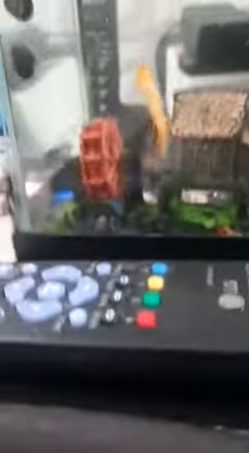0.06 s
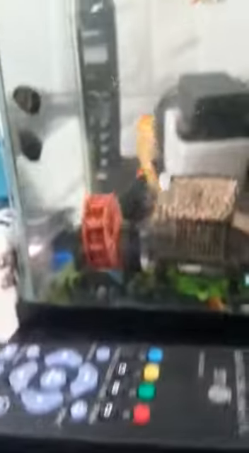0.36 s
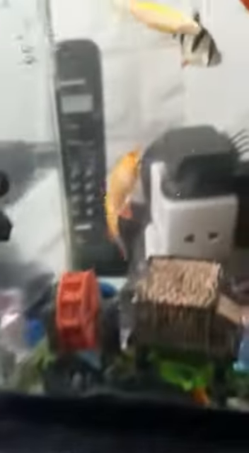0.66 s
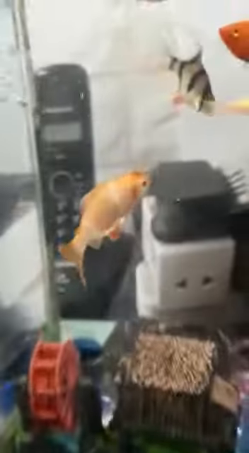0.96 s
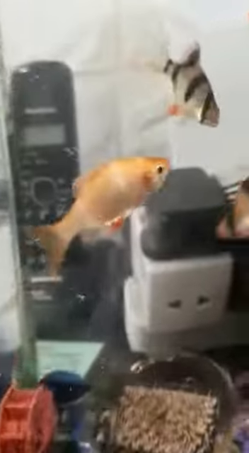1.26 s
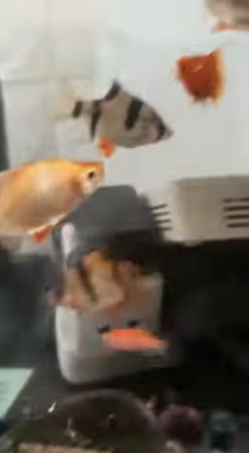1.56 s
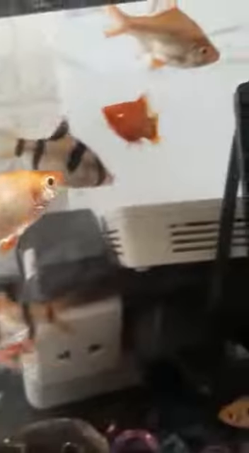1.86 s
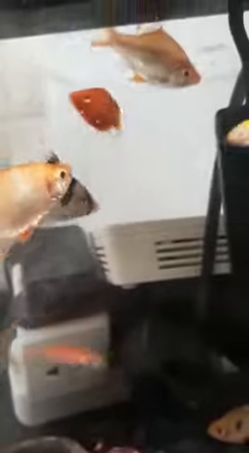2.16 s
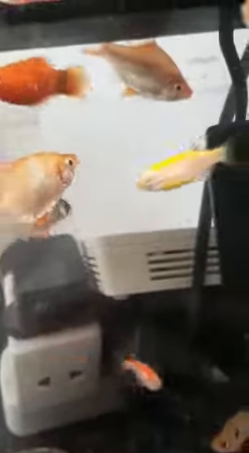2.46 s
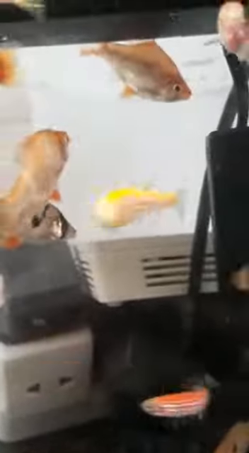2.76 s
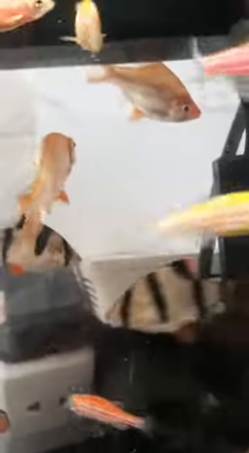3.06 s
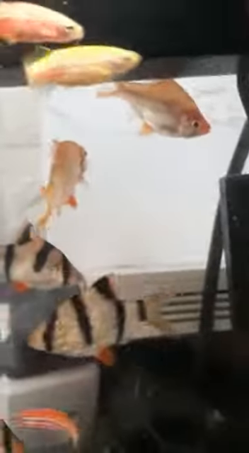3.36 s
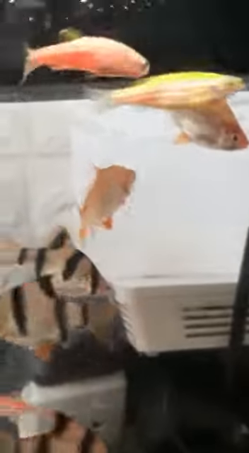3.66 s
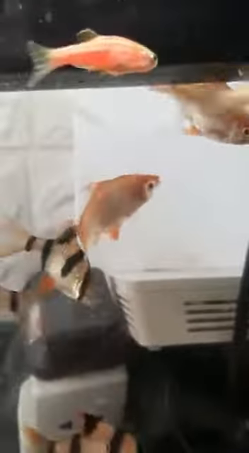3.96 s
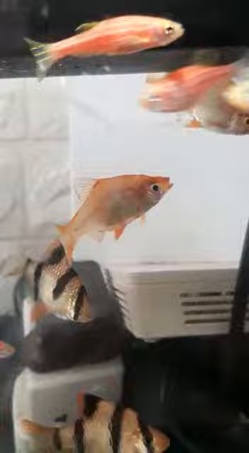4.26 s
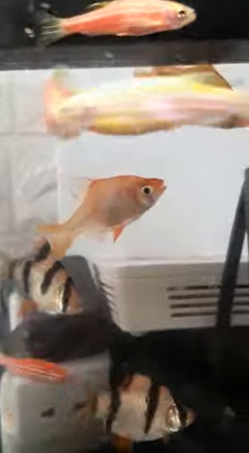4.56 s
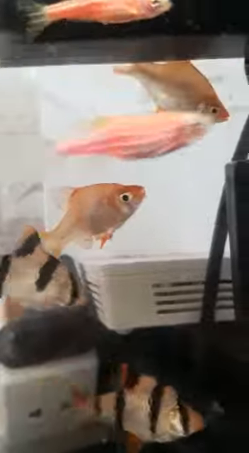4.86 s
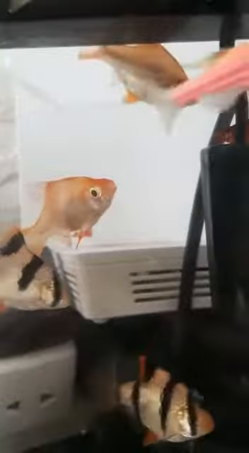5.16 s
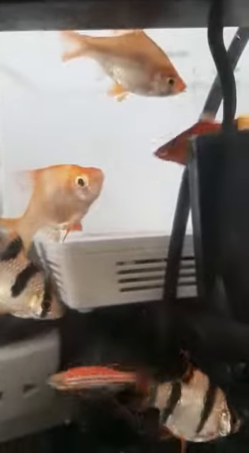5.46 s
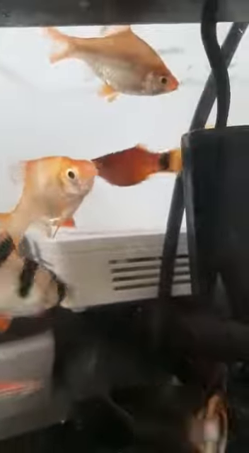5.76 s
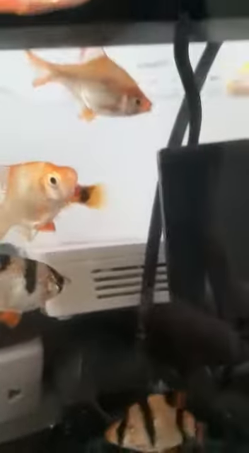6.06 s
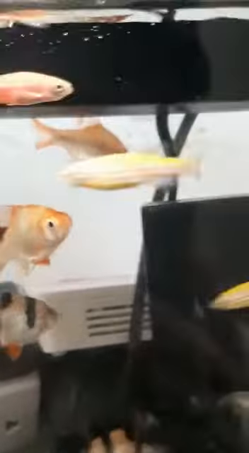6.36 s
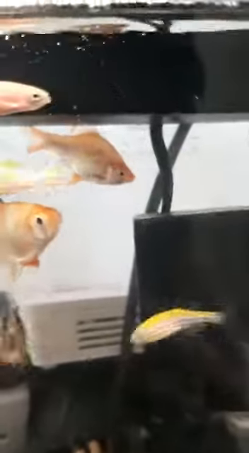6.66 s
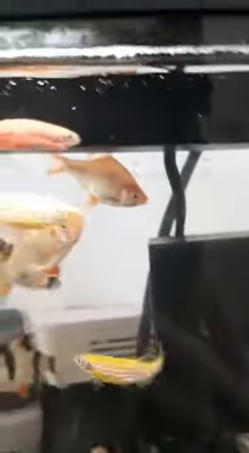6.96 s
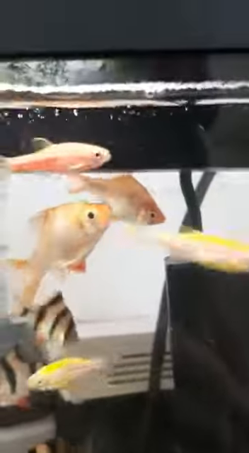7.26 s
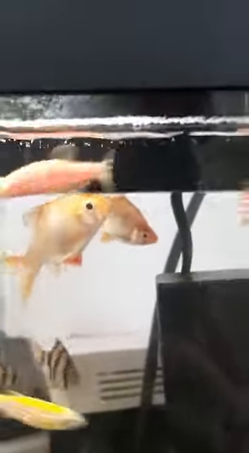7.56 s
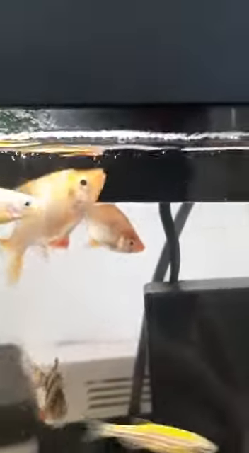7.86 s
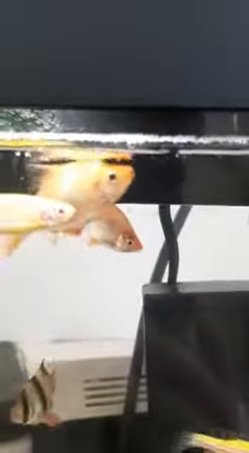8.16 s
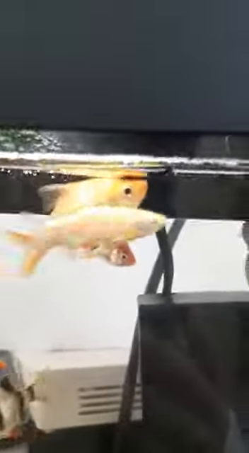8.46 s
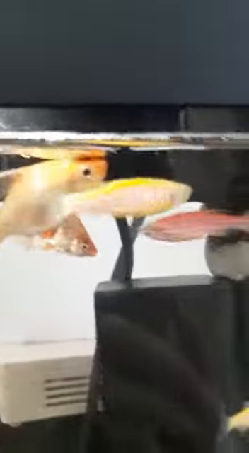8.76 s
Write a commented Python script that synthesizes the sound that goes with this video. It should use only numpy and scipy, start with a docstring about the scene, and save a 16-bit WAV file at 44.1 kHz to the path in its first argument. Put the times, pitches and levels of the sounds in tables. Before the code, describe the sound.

A small aquarium filter pump hums steadily through a glass tank for the whole nine seconds, low and slightly rumbling, close to a hand-held phone. The hum swells a little and moves from the left to the centre during the first second. Over it, water trickles softly, dull at first. Single bubbles plip irregularly throughout, the clearest at about 0.5, 1.5, 2.4, 3, 6, 6.2 and 7.2 seconds. A hand brushes faintly over the phone during the first three seconds. A short, dull tap comes at 1.4 seconds, and a small, soft splash between 4.4 and 4.9 seconds. Around then the microphone rises to the rim: the water becomes brighter and a smooth high hiss comes up and stays. Light taps fall near 6, 7 and 8.3 seconds, while the hum and trickle continue to the end.

```python
"""A small aquarium filter pump hums through the glass tank and its stand, close to a hand-held phone.
The outflow churns and trickles at the surface, where single bubbles plip under the hood.
The phone's two microphones close in over the first second or so; about halfway they rise to the rim,
where the water is brighter and a high hiss comes up. A hand brushes over the case in the first
seconds; a few light taps and a small splash fall here and there."""
import sys
import numpy as np
from scipy import signal
from scipy.fft import rfft, irfft
from scipy.io import wavfile

SR = 44100
rng = np.random.default_rng(int(sys.argv[2]) if len(sys.argv) > 2 else 0)


def digitize_waveform(pressure):
    """Quantize a signal to 16-bit integers and store it at the path in sys.argv[1].

    Rows of a 2-D input are taken as channels; values are limited to [-1, 1].
    """
    field = np.atleast_2d(pressure).T
    bounded = np.clip(field, -1, 1)
    quanta = np.round(bounded * 32767).astype(np.int16)
    wavfile.write(sys.argv[1], SR, quanta)


N = 388080
T = np.arange(N) / SR
FREQS = np.fft.rfftfreq(N, 1 / SR)

# Levels in the tables are relative; side_db is left minus right.
# hum of the rotor: shaft_multiple, level_db, side_db
ROTOR_HARMONICS = [(2, -55, 6.5), (3, -58.5, 5), (4, -45, .5), (5, -48, 4), (6, -48.5, -1.5), (7, -53, 0),
                   (8, -57, 4.5), (9, -64.5, 8), (10, -51, 3), (11, -46.5, -3), (12, -59, -7),
                   (13, -70, 12.5), (14, -63.5, -7.5), (16, -79, -24), (20, -75.5, 11.5), (23, -72, 12.5)]
# magnetic buzz and its beats with the shaft: mains_multiple, added_shaft_multiple, level_db, side_db
MAINS_BUZZ = [(2, 0, -54, -8), (2, 1, -51.5, 3), (4, 0, -56, 2.5), (4, 1, -71, 2)]
# resonances of tank and stand: pitch_hz, nominal_width_hz, level_db, side_db
TANK_MODES = [(56, 9.4, -65, -7.5), (76, 7.5, -58.5, -7.5), (121.4, 20, -66, -10), (145.2, 15.8, -54, 2.5),
              (205.8, 41, -51.5, 7.5), (247.6, 56, -59, 5.5), (306, 45, -59, 0), (368.4, 90, -53.5, -3),
              (461, 98, -58, -1), (580, 200, -61, 7.5)]
# spectrum of running water: frequency_hz, level_db
WATER_SPECTRUM = [(300, -4), (600, -3.5), (850, 1.5), (1100, -3), (1350, -3.5), (1700, -4), (2400, -11.5),
                  (3500, -10), (4500, -13), (7000, -11.5), (15000, -16)]
# clear single bubbles: start_s, level_db, pitch_hz
CLEAR_BUBBLES = [(.51, -33, 1290), (1.248, -49, 2570), (1.26, -35.5, 1520), (1.448, -33, 1160),
                 (1.594, -29.5, 1330), (1.677, -46, 2560), (2.218, -38, 1740), (2.378, -43.5, 1850),
                 (2.419, -33.5, 1385), (2.641, -40, 1300), (2.87, -42, 1660), (2.964, -32.5, 1510),
                 (3.097, -41.5, 3210), (3.287, -51, 2920), (3.429, -38, 1570), (4.154, -44, 3040),
                 (4.18, -40.5, 1670), (4.695, -54, 10500), (5.808, -46.5, 3100), (5.985, -30.5, 1335),
                 (6.166, -28.5, 1326), (6.563, -39, 1804), (6.85, -49, 6500), (6.884, -44.5, 1860),
                 (7.189, -33.5, 1280), (7.309, -50, 2530), (7.722, -49, 3460), (7.93, -40.5, 1220),
                 (8.21, -47, 3070), (8.381, -45, 2780), (8.526, -44.5, 3520)]
# light taps and a small splash: start_s, level_db, brightness_hz, t60_s
TAPS_AND_SPLASH = [(1.362, -36, 750, .022), (3.606, -49.5, 2000, 0.059), (4.413, -51.5, 12000, 0.21),
                   (4.835, -50.5, 2200, 0.31), (4.863, -48, 1500, .17), (5.954, -38, 2000, 0.032),
                   (6.958, -41, 4940, 0.023), (7.985, -46, 7000, .025), (8.339, -48, 4000, 0.069)]
# spectrum of skin sliding on the case: frequency_hz, level_db
SKIN_SPECTRUM = [(2500, 0.5), (3300, -4.5), (5000, -6), (7000, -3), (9000, -5.5), (12000, -7), (15000, -2)]
# strokes of the hand: start_s, fastest_s, end_s, level_db, brightness_hz
HAND_STROKES = [(-.1, .04, 0.23, -51, 11000), (.1, .22, 0.51, -56.5, 12500), (.36, .45, 0.54, -56.5, 9500),
                (0.672, 0.724, 0.86, -54.5, 12900), (.84, 0.983, 1.15, -52, 12100),
                (1.0, 1.14, 1.4, -56.5, 10700), (1.327, 1.49, 1.86, -51, 7900),
                (1.773, 2.04, 2.2, -61.5, 7900), (2.503, 2.936, 3.17, -61, 4850),
                (3.1, 3.25, 3.31, -63, 10000)]
# spectrum of the high hiss: frequency_hz, level_db
HISS_SPECTRUM = [(2000, -4), (4300, 3), (6000, -4), (7800, -12), (10000, 1), (14000, 0.5), (15500, 2)]

BIG_HZ, TINY_HZ = 1600, 5000  # bubbles pitched below the first plop; above the second they only spit


def pump(shaft_hz=47.97, mains_hz=50.0, waver_db=1.0, wobble_rad=0.019, dispersion_rad=.68):
    """Shaft harmonics and mains buzz through the glass; the water load makes each line waver a little."""
    shaft = 2 * np.pi * shaft_hz * T + wobble_rad * walk(1.4)
    mains = 2 * np.pi * mains_hz * T
    # bending waves in the glass disperse the kick of each turn into a sweep
    lines = [(round(k) * shaft + dispersion_rad * round(k) ** 2, db, side)
             for k, db, side in ROTOR_HARMONICS]
    lines += [(round(m) * mains + round(k) * shaft + rng.uniform(0, 2 * np.pi), db, side)
              for m, k, db, side in MAINS_BUZZ]
    out = np.zeros((2, N))
    for phase, db, side in lines:
        hz = (phase[-1] - phase[0]) / (2 * np.pi * T[-1])
        # shorter waves differ more in phase between the microphones
        lead = np.array([[.5], [-.5]]) * min(.55 * (hz / 528) ** 6, 2.5)
        out += np.sqrt(2) * undb(db + waver_db * walk(1.57)) * pan(side) * np.cos(phase + lead)
    return out


def churn(surge_db=0.96):
    """Turbulence around the impeller rumbles in the resonances of tank and stand."""
    out = np.zeros((2, N))
    for hz, width, db, side in TANK_MODES:
        unshared = .08 + (hz / 680) ** 3  # the bass reaches both microphones alike
        push = rng.standard_normal(N) + unshared * rng.standard_normal((2, N))
        out += band(push, hz, 1.34 * width) * undb(db + surge_db * walk(3.7)) * pan(side)
    return out


def trickle(count=4000, spread_db=3.5, fizz_db=-5, wash_db=-2, ripple_db=2.7, gain_db=-55):
    """The outflow folds countless tiny bubbles into the surface over a soft wash."""
    fizz = np.zeros(N)
    for when, pitch, size in rng.random((count, 3)):
        strength = undb(-spread_db * np.log(max(size, .03)))
        add(fizz, when * N / SR, strength * bubble(hz=850 * 6 ** pitch, t60=0.015, rise=.1))
    fizz = room(np.array([fizz, fizz]), wet_db=4.5, t60=0.083)
    # the low wash comes straight from the surface, the treble is scattered by the hood
    straight = resonate(rng.standard_normal(N), hz=1130, width=1400)
    wash = 1.19 * mic_pair(np.array([straight, straight])) + 0.65 * rng.standard_normal((2, N))
    water = undb(fizz_db) * colour(fizz, WATER_SPECTRUM)
    water += undb(wash_db + ripple_db * walk(6.3)) * colour(wash, WATER_SPECTRUM)
    # the water's treble is duller for the first second or so, and brightens about halfway
    dull = irfft(rfft(water) / (1 + (FREQS / 2000) ** 8), N)
    treble_db = -4 + 3 * mic_height() - opening()
    return (dull + undb(treble_db) * (water - dull)) * undb(gain_db) * pan(-2)


def plips(plop_rise=0.16, ping_rise=0.025, splash_db=-21, spray_db=-15, spit_db=10, snap_db=-12):
    """Big bubbles plop upward in pitch on the right, small ones ping and spray left; the hood echoes."""
    out = np.zeros((2, N))
    t = T[:SR // 5]
    for start, db, hz in list(CLEAR_BUBBLES) + faint_bubbles():
        big = 1 / (1 + (hz / BIG_HZ) ** 20)
        tiny = 1 / (1 + (TINY_HZ / hz) ** 10)
        gain = undb(db) * pan(7 * (1 - 2 * big))
        ring = bubble(hz, t60=.042 * (hz / BIG_HZ) ** .6, rise=ping_rise + plop_rise * big)
        add(out, start, gain * (1 - tiny) * ring)
        spatter = band(rng.standard_normal((2, len(t))), hz, 0.39 * hz) * decay(t, t60=0.2)
        spatter_db = spray_db + (splash_db - spray_db) * big + spit_db * tiny
        # the film breaks with a brief, broad snap
        snap = band(rng.standard_normal(len(t)), hz, 0.59 * hz) * decay(t, t60=.012)
        add(out, start, gain * (undb(spatter_db) * spatter + undb(snap_db) * snap))
    return room(out, wet_db=-8, t60=.2)


def faint_bubbles(count=10, low_hz=1200, high_hz=3310, spread_db=2.5):
    """Small chance bubbles, the higher the weaker: start_s, level_db, pitch_hz."""
    when, pitch, weakness = rng.random((count, 3)).T
    hz = low_hz * (high_hz / low_hz) ** pitch
    db = -50 - spread_db * (2 * weakness - 1) - 20 * np.log10(hz / BIG_HZ)
    return list(zip(when * N / SR, db, hz))


def bubble(hz, t60, rise):
    """A pocket of air rings and dies away, its pitch climbing as it nears the surface."""
    t = T[:int(t60 * SR) + 2]
    pitch_hz = hz * (1 + rise * (.6 - np.exp(-5 * t / t60)))
    cycles = np.cumsum(pitch_hz) / SR
    return np.sin(2 * np.pi * cycles) * decay(t, t60) * (1 - np.exp(-cycles))


def taps_and_splash(gain_db=-4):
    """Light taps and a small splash: short cracks, duller or brighter."""
    out = np.zeros((2, N))
    t = T[:SR // 4]
    for start, db, hz, t60 in TAPS_AND_SPLASH:
        crack = unit(resonate(rng.standard_normal((2, len(t))), hz, 1.15 * hz))
        add(out, start, undb(db + gain_db) * crack * decay(t, t60))
    return room(out, wet_db=-7, t60=.2)


def hand(squeak_db=-48.5, grip_db=1.4, drift_db=0.56):
    """Handling noise at the microphones: skin slides over the case and catches once in a thin squeak."""
    friction = colour(rng.standard_normal((2, N)), SKIN_SPECTRUM)
    squeak = unit(resonate(friction, hz=10800, width=1600))
    out = undb(squeak_db) * stroke(start_s=0.83, fastest_s=0.885, end_s=0.94) * squeak
    for start, fastest, end, db, hz in HAND_STROKES:
        grain = np.roll(friction, rng.integers(N), axis=1)
        out += undb(db) * stroke(start, fastest, end) * unit(resonate(grain, hz, 1.24 * hz))
    # the skin grips and lets go
    return out * undb(grip_db * walk(130) + drift_db * walk(24)) * pan(-3)


def stroke(start_s, fastest_s, end_s):
    """Loudness of one slide follows the hand as it speeds up evenly, then slows to rest."""
    speed = np.interp(T, [start_s, fastest_s, end_s], [0, 1, 0])
    return speed ** 0.62


def hiss(below_db=-68, rim_db=-56.5):
    """A smooth high hiss that grows as the microphones rise towards the surface."""
    db = below_db + (rim_db - below_db) * mic_height()
    return colour(rng.standard_normal((2, N)), HISS_SPECTRUM) * undb(db) * pan(-1)


def room(x, wet_db, t60):
    """Direct sound plus dense reflections from hood, glass and walls, different at each microphone."""
    t = T[:SR // 2]
    tail = rng.standard_normal((2, len(t))) * decay(t, t60) * (1 - np.exp(-t / 0.0068))
    tail /= np.sqrt(np.sum(tail ** 2, axis=1, keepdims=True))
    reflections = signal.fftconvolve(x.mean(axis=0)[None], tail, axes=1)[:, :N]
    return mic_pair(x) + undb(wet_db) * reflections


def mic_pair(x, lag_s=0.00045):
    """Sound from the surface reaches the left microphone first."""
    return np.array([x[0], irfft(rfft(x[1]) * np.exp(-2j * np.pi * FREQS * lag_s), N)])


def mic_height(midway_s=4.73, ease_s=0.44):
    """Height of the phone: 0 beside the glass, 1 at the rim."""
    return .5 + .5 * np.tanh((T - midway_s) / (2 * ease_s))


def opening(fade_s=1.01):
    """1 at the start, easing towards 0 over the first second or so."""
    return np.exp(-(T / fade_s) ** 2)


def undb(db):
    """Decibels to gain."""
    return 10 ** (np.asarray(db) / 20)


def decay(t, t60):
    """Fall by 60 dB every t60 seconds."""
    return undb(-60 * t / t60)


def unit(x):
    """Scale to rms 1."""
    return x / np.sqrt(np.mean(x ** 2))


def pan(side_db):
    """Left and right gains for a level difference."""
    return undb(np.array([[.5], [-.5]]) * side_db)


def colour(x, spectrum):
    """Shape a sound by a spectrum table, rolled off below its first row, at rms 1."""
    hz, db = np.transpose(spectrum)
    gain = undb(np.interp(np.log(FREQS + 1), np.log(hz), db)) * np.minimum(FREQS / hz[0], 1) ** 2
    return unit(irfft(rfft(x) * gain, N))


def resonate(x, hz, width):
    """Two-pole resonance with gain 1 at its centre."""
    g, k = np.tan(np.pi * min(hz, SR / 2 - 1000) / SR), width / hz
    return signal.lfilter([k * g, 0, -k * g], [1 + k * g + g * g, 2 * g * g - 2, 1 - k * g + g * g], x)


def band(x, hz, width):
    """A resonance applied twice for steep skirts, at rms 1."""
    return unit(resonate(resonate(x, hz, width), hz, width))


def walk(rate_hz):
    """Smooth random drift at rms 1."""
    return unit(irfft(rfft(rng.standard_normal(N)) * np.exp(-(FREQS / rate_hz) ** 2) * (FREQS > 0), N))


def add(out, start_s, sound):
    """Mix a short sound in at a given time."""
    i = int(np.clip(start_s * SR, 0, N - 1))
    out[..., i:i + sound.shape[-1]] += sound[..., :N - i]


def scene():
    """The hum grows and moves in from the left as the phone nears; water and handling lie on top."""
    hum_db = np.interp(opening(), [0, 1], [-0.54, -3])
    side_db = np.interp(opening(), [0, 1], [-0.94, 5])
    hum = (pump() + churn()) * undb(hum_db) * pan(side_db)
    return hum + trickle() + plips() + taps_and_splash() + hand() + hiss()


def record(dry, bass_hz=35, top_hz=15700):
    """The phone thins the deep bass and cuts the top."""
    thin = signal.sosfilt(signal.butter(2, bass_hz, "high", fs=SR, output="sos"), dry)
    return signal.sosfilt(signal.ellip(14, .1, 80, top_hz, fs=SR, output="sos"), thin)


dry = scene()
out = record(dry)
digitize_waveform(out)
```